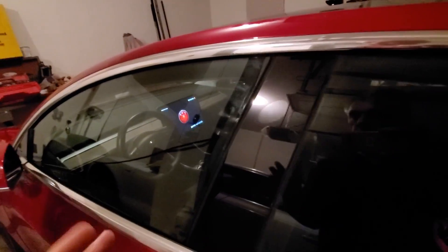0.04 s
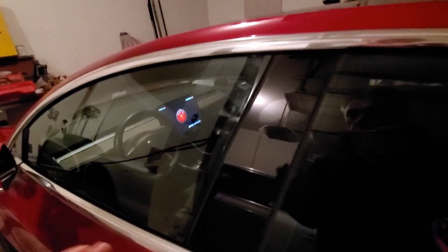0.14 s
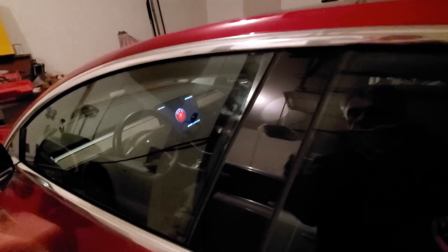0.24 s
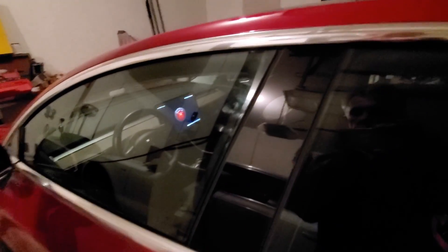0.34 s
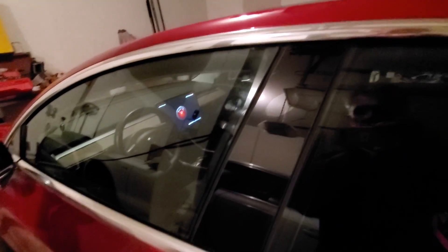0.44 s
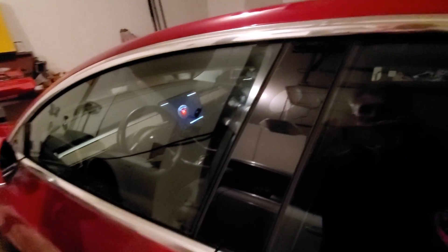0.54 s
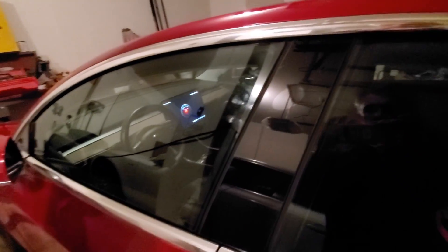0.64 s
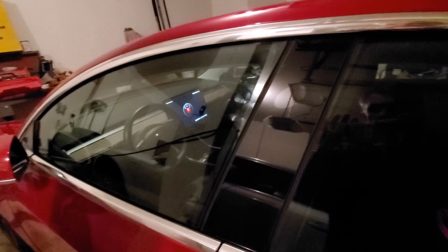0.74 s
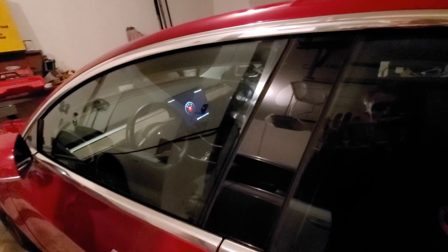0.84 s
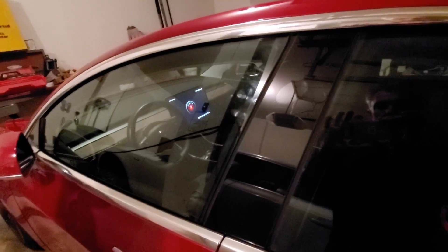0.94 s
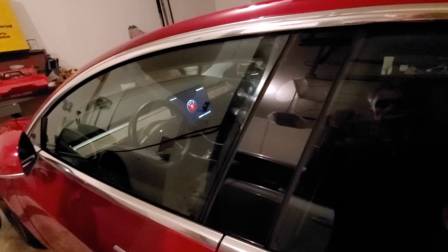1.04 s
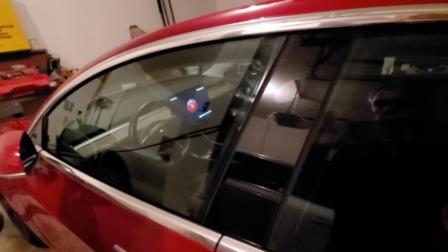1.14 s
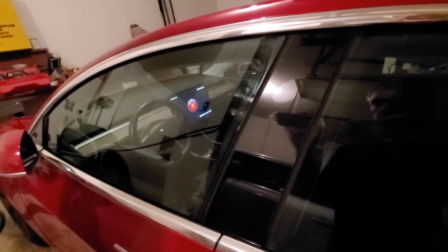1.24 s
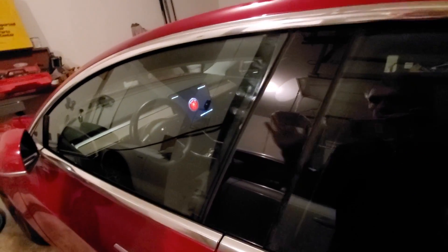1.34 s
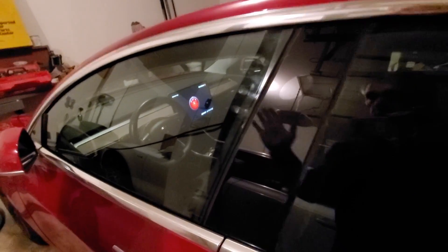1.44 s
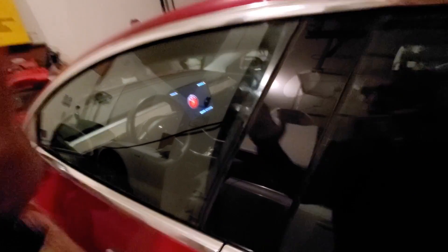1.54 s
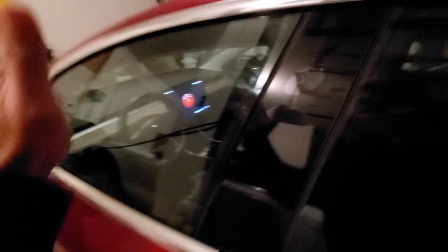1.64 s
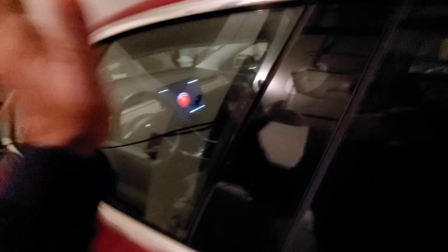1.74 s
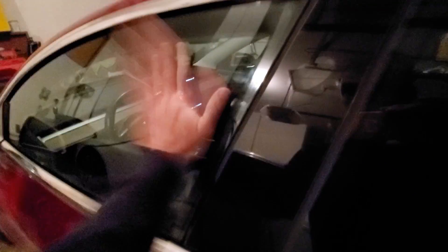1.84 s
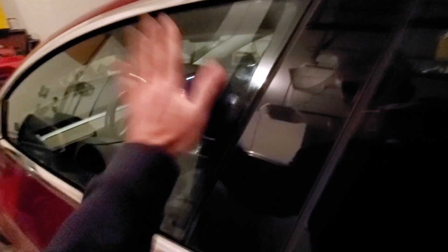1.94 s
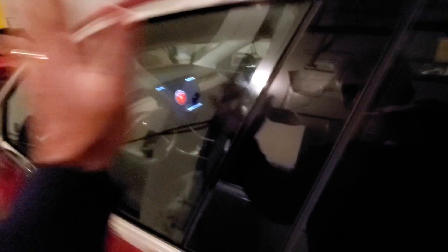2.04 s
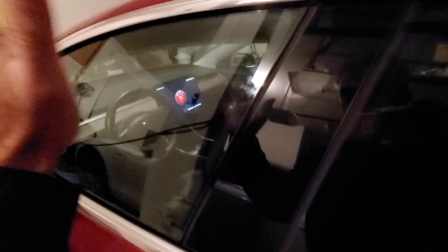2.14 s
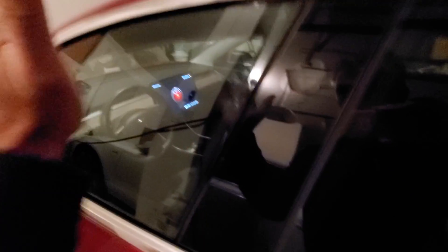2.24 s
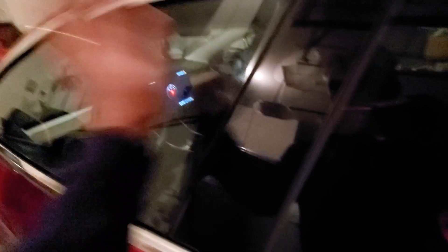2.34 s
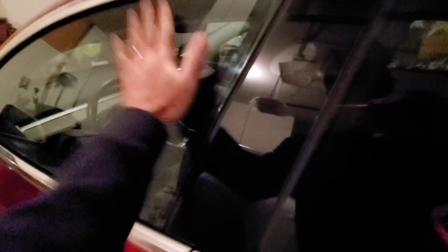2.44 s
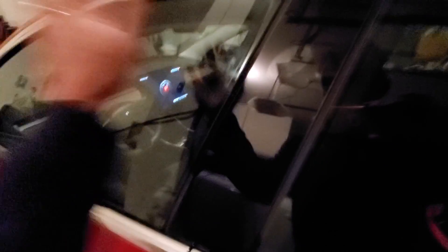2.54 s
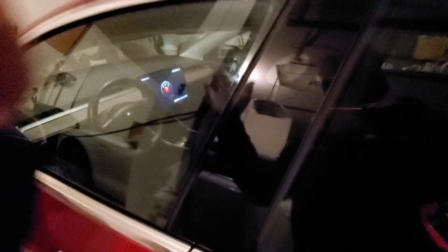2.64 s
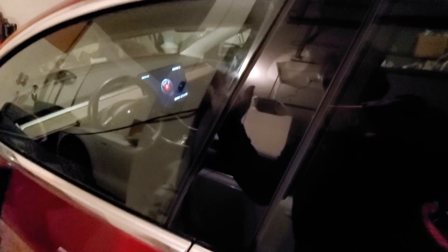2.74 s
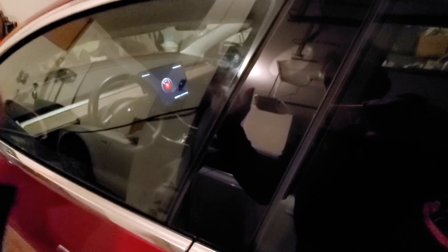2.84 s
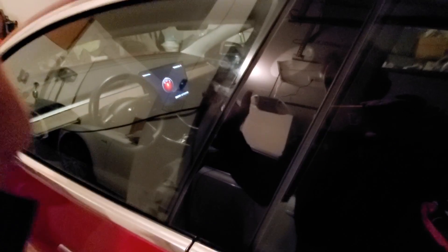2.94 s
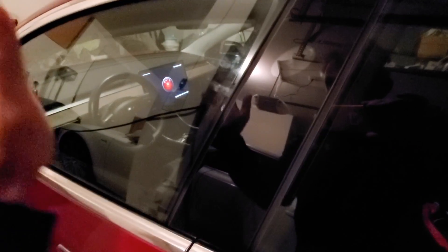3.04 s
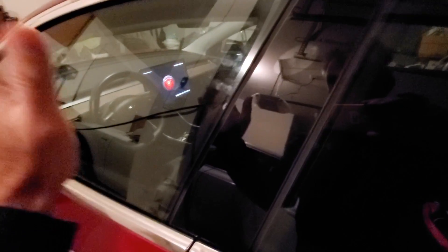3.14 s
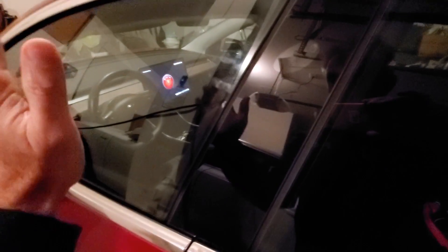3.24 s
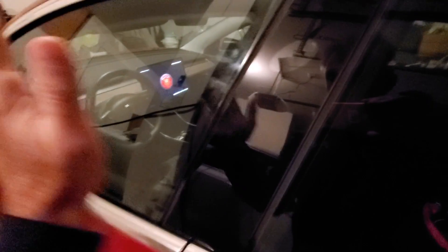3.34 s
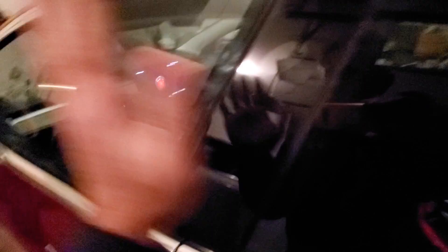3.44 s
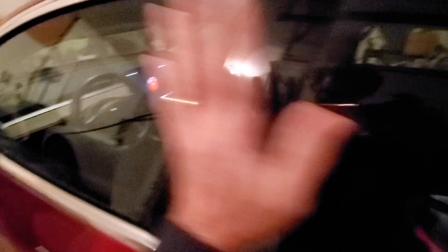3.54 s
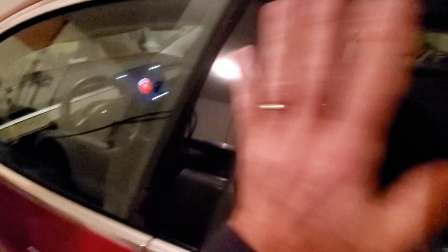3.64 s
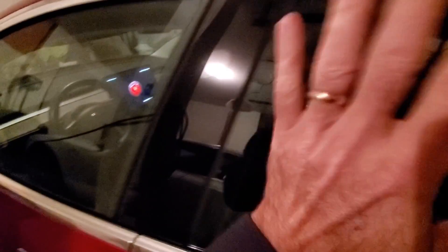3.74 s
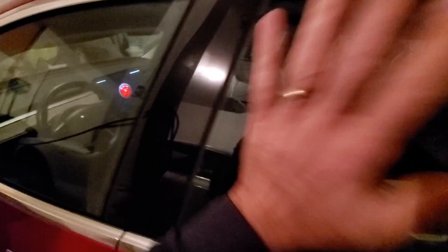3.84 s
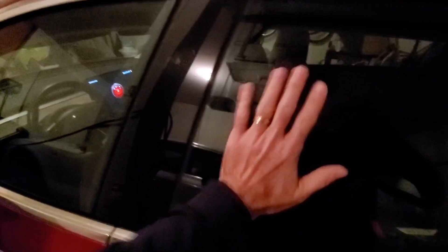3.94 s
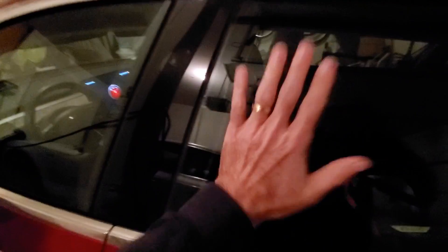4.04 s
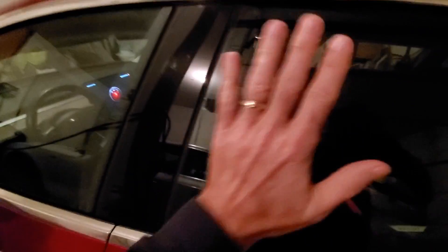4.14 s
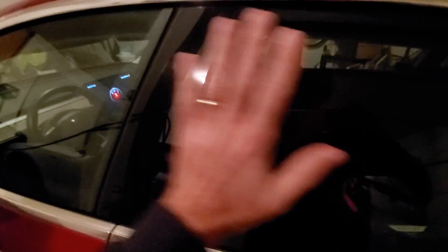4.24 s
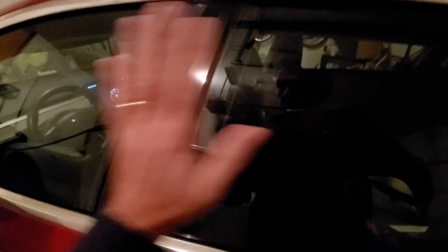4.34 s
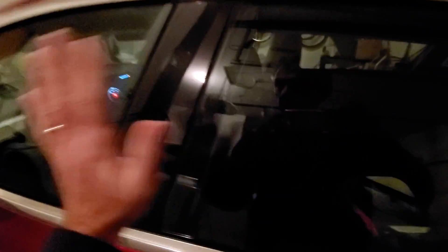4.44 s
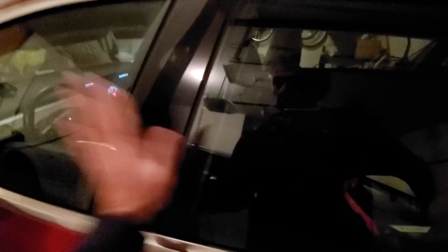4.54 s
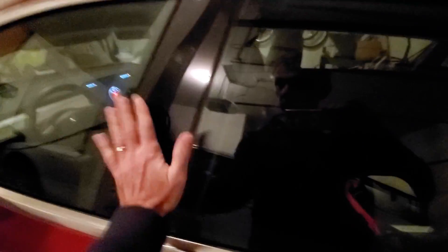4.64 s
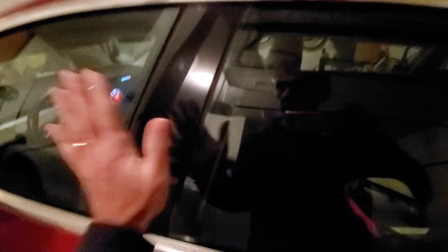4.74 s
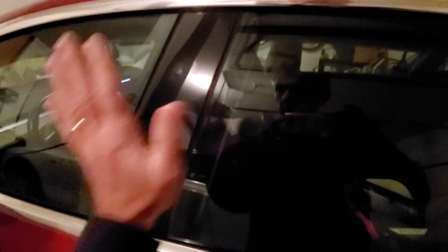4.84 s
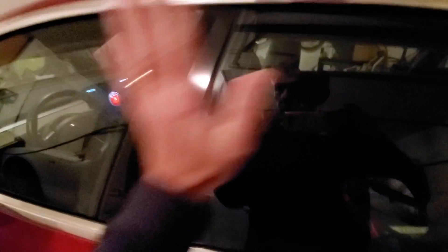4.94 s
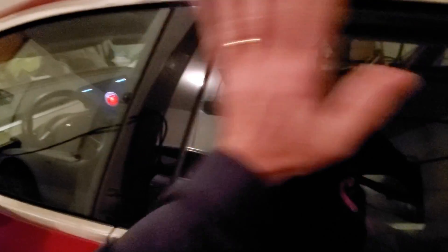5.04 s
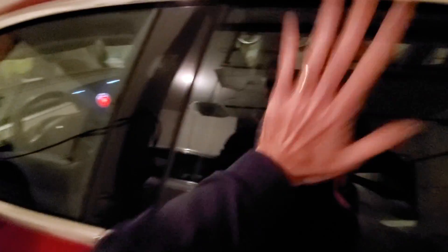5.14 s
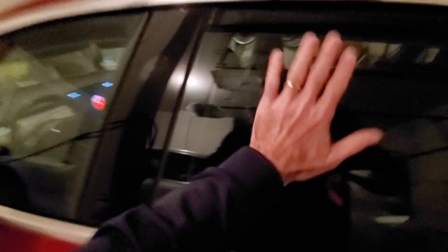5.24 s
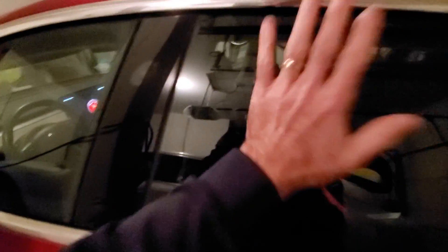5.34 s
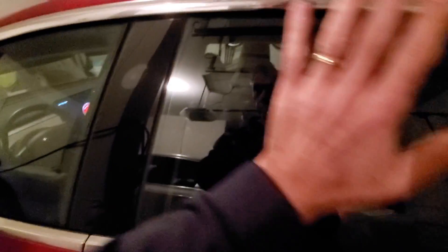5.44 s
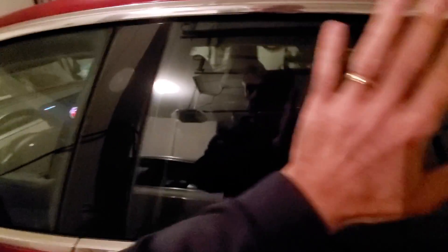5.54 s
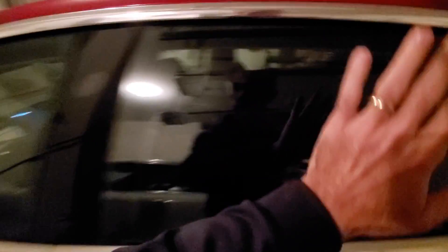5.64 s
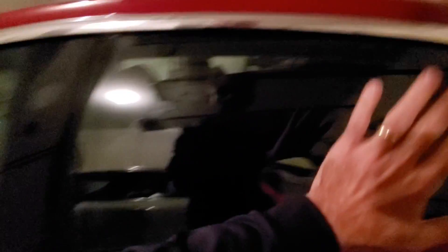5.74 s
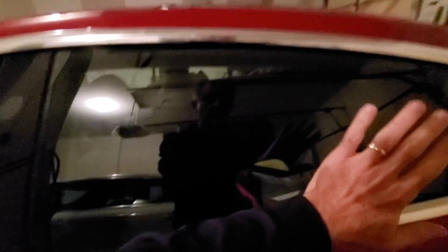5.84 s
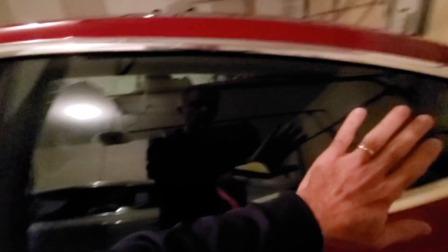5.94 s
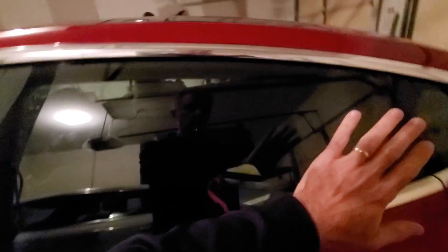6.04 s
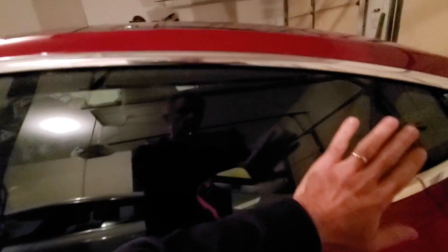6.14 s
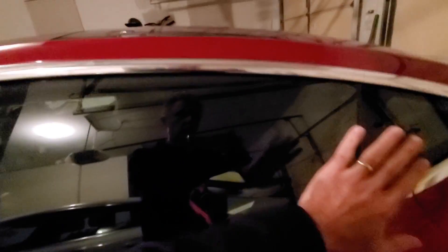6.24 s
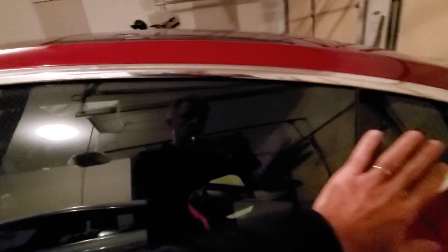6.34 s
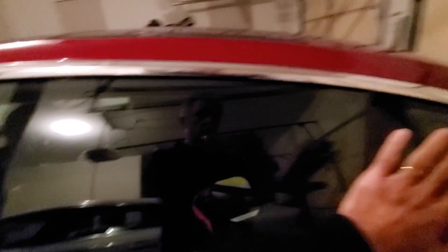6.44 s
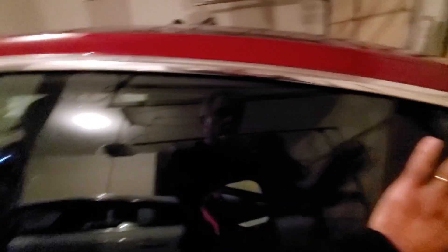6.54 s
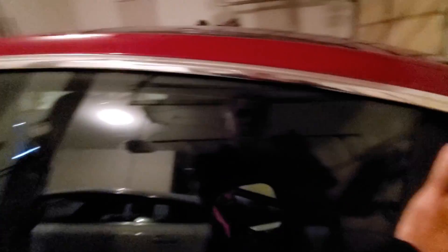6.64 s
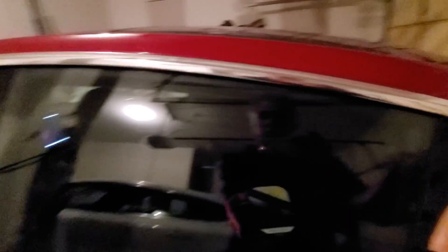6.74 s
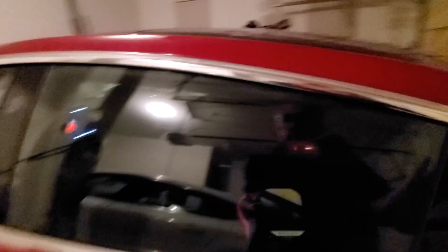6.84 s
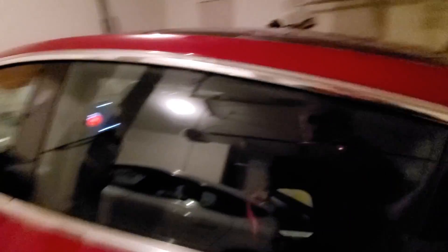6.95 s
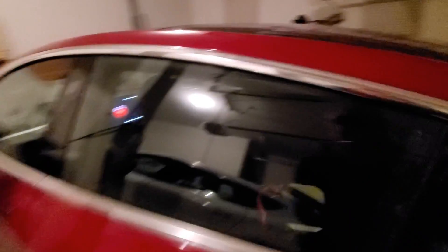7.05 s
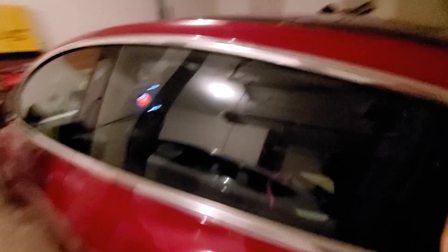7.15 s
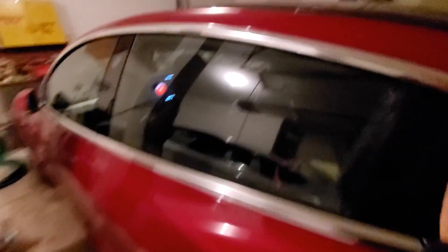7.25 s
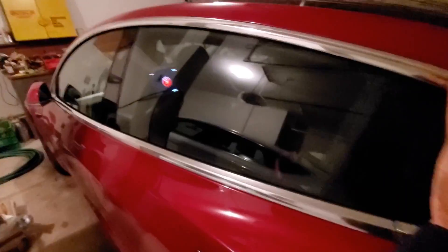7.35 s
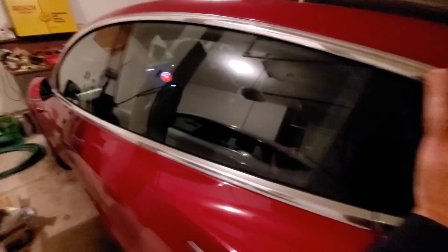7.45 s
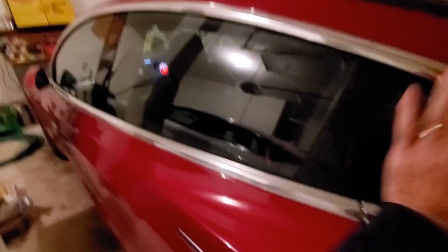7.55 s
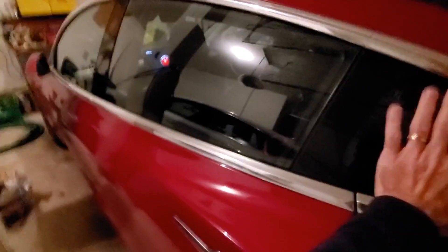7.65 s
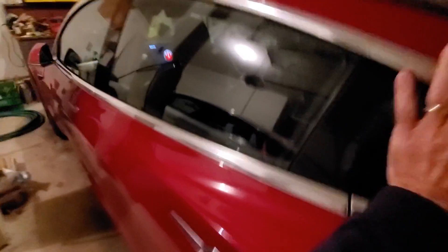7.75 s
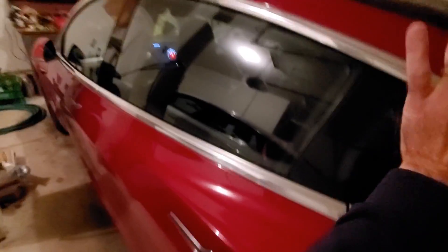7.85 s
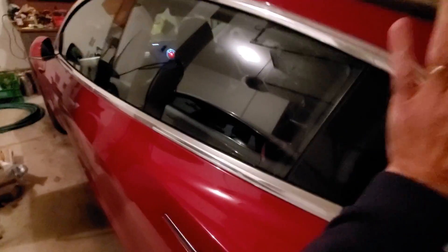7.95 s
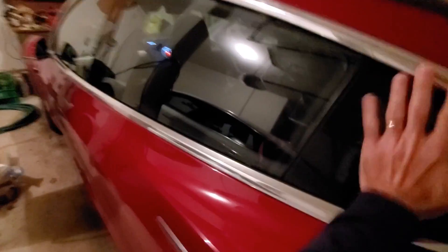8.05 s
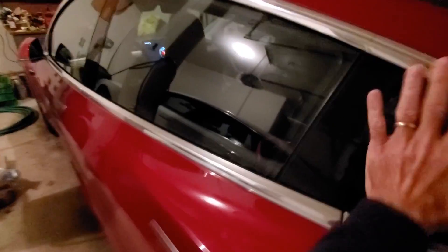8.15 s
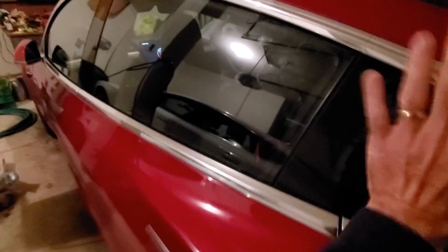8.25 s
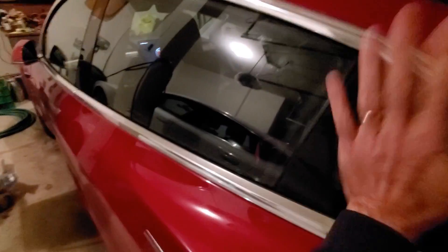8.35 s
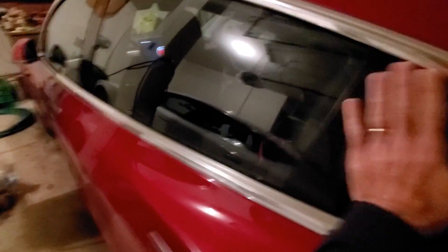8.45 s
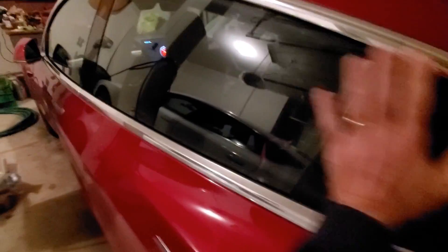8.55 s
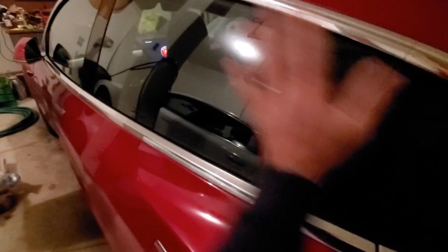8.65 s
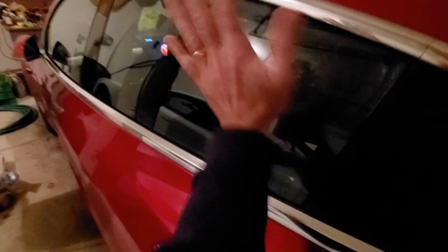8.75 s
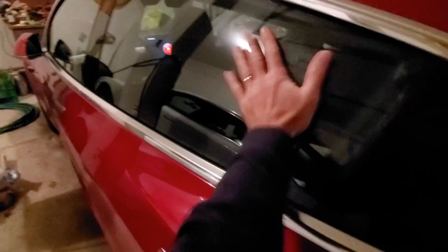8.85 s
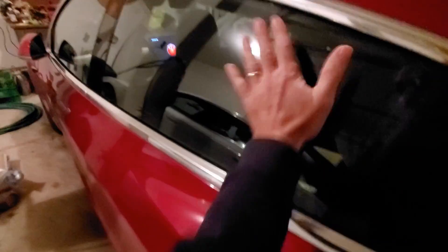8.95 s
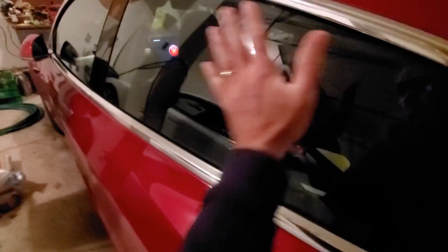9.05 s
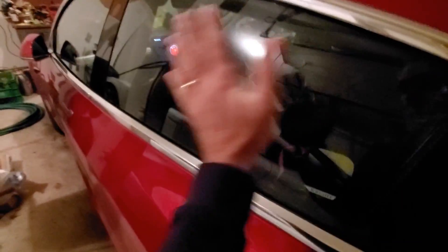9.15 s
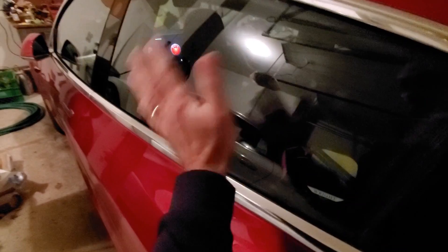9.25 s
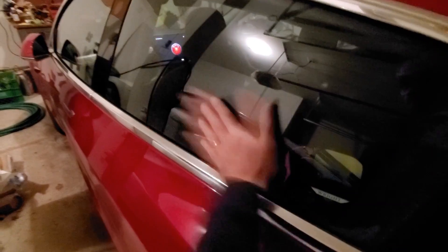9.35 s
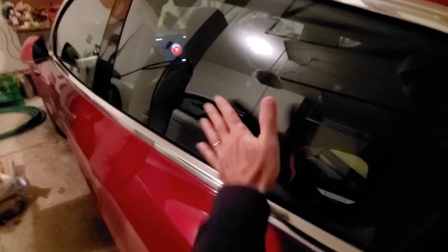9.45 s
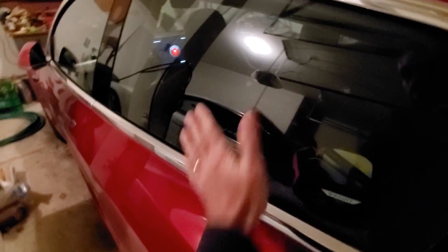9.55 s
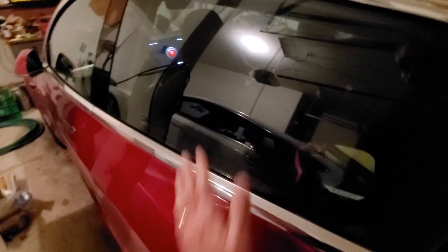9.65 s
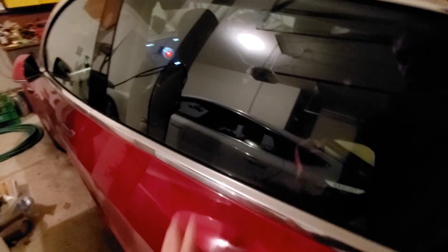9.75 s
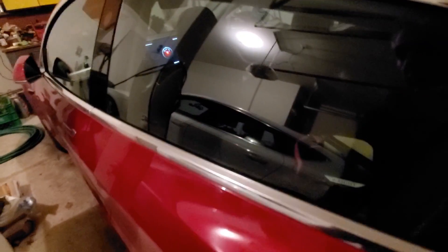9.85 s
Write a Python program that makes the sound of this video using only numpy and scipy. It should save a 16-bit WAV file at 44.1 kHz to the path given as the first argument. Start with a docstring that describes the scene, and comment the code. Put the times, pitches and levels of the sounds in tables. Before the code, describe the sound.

A few faint scuffs give way to five loud, sharp palm slaps on car window glass, each booming briefly and ringing on in the garage. In a pause, quiet footsteps scrape and tick on the concrete floor. Five more slaps follow in quicker succession, the first three on a smaller pane, and clothes rustle faintly at the end. The stereo microphone is close to the car, with a low rumble beneath everything.

```python
"""A bare garage, a stereo microphone close to a car. A few faint scuffs sound over a low rumble.
From 1.9 s a flat hand slaps the door windows five times: each pane knocks and booms in its modes,
skin and a finger ring crack on the glass, and the garage rings on. From 5.7 s shoes scuff, tick
and thud on the concrete. From 7.6 s three slaps knock on the small rear pane, and from 8.85 s
two more land on a door pane while clothes rustle faintly."""
import sys
import numpy as np
from scipy import signal
from scipy.fft import rfft, irfft
from scipy.io import wavfile
from scipy.ndimage import uniform_filter1d

SR = 44100
rng = np.random.default_rng(int(sys.argv[2]) if len(sys.argv) > 2 else 0)


def wav_out(sig):
    """Save sig, one row per channel (or a flat mono array), as 16-bit PCM at SR to the path in sys.argv[1]."""
    wavfile.write(sys.argv[1], SR, np.round(np.clip(np.atleast_2d(sig).T, -1, 1) * 32767).astype(np.int16))


N = 436149
LEAD_S = .005   # fingers may land this long before the palm

# Slaps, close up: (pane, time [s], contact [s], knock [dB], boom [dB], clap [dB], crack [dB],
# bright crack [dB], boom pitch [ratio], mode pitch [ratio], knock tilt [dB/octave], crack delay [s],
# treble left-right [dB], free swing [s], cupped palm [Hz], cupped palm [dB],
# bass to garage [dB], treble to garage [dB])
SLAPS = [("door", 1.864, .0008, -11, -10.5, -28, -8.5, -18.5, 1.05, 1.03, 1.3, .00078, -11.5, .035, 350, -30.5, 1.5, 8.3),
         ("door", 2.402, 0.0011, -8.5, -8, -22, 0, -4, 1.32, 1.07, 2.2, .003, 6.9, 0.019, 540, -19.5, -1.5, 3.5),
         ("door", 3.9516, .0012, -12, -13, -30.5, -5, -8, 1.132, 0.98, -3.5, .0015, -9, 0.041, 1300, -25.5, 4.7, 5.6),
         ("door", 4.609, .0009, -18.5, -18, -36, -17, -27.5, 0.92, 1.21, -7.5, -0.0013, -7.5, 0.047, 335, -17, -3, -1.2),
         ("door", 5.203, 0.0015, -12, -13, -28.5, -5, -8.5, 1.1, 1.05, -3, .0015, -7.5, 0.032, 1072, -15.5, 4.3, 5.3),
         ("rear", 7.6024, .0024, -13.5, -34, -32, -21, -25.5, 0.77, 1.034, 2.2, -.0025, -13.5, .034, 385, -4.5, .13, 0.7),
         ("rear", 8.056, 0.0025, -6, -17.5, -23.5, -7.5, -9.5, .83, 1.02, .15, 0.0027, -11, 0.025, 1700, -20, 1, 6.8),
         ("rear", 8.411, 0.00053, -12, -14.5, -22.5, -8.5, -16, 1.02, 1.02, -4, .002, -18, .023, 1616, -11.5, .42, 0.12),
         ("door", 8.850, 0.00078, -7.5, -9.5, -21.5, 1.6, -6.5, 1.15, .92, 0.96, 0.0019, -6, 0.036, 3200, -37.5, -0.93, -0.19),
         ("door", 9.388, 0.00072, -9.5, -20.5, -26.5, -10.5, -21.5, 0.894, .95, -6, .0028, -7.5, 0.071, 385, -15, -1.9, -.2)]
def slap(pane, contact, knock_db, boom_db, clap_db, crack_db, bright_db, boom_pitch, pitch, tilt_db,
         delay, pan_db, free, cup_hz, cup_db, bass_sent_db, treble_sent_db):
    """A hand hits the glass; returns the stereo sound at the microphone and the feed to the garage."""
    t = np.arange(SR // 3) / SR - LEAD_S
    bass, clap = pane_modes(t, pane, contact, knock_db, boom_db, clap_db,
                            boom_pitch, pitch, tilt_db, delay, free)
    ring, skin, smooth_skin = hand_crack(np.maximum(t - delay, 0), crack_db, bright_db)
    # the pocket of air under the cupped palm rings for 24 cycles
    cup = from_db(cup_db) * ringing(t - max(delay, .0024), cup_hz, t60=24 / cup_hz)
    cup_pan_db = pan_db * min(cup_hz / 1200, 1)   # leans fully to one side only above 1200 Hz
    treble = clap + ring + skin
    treble = np.array([np.roll(treble, 6), treble])   # reaches the microphone's left side later
    direct = bass * pan(-1.2) + treble * pan(pan_db) + cup * pan(cup_pan_db)
    sent = bass * from_db(bass_sent_db) + (clap + ring + cup + smooth_skin) * from_db(treble_sent_db)
    return direct, sent


# Modes of a door pane and the rear pane, before each slap shifts them:
# (frequency [Hz], level [dB], t60 [s])
DOOR_MODES = [(62.4, -0.5, 0.62), (86.4, 7, 0.14), (107.6, -19, 0.05), (196, -3, 0.11), (255, -0.5, 0.049),
              (292, -6, 0.071), (349.3, -5.5, 0.11), (455, -6.5, 0.11), (536, -18.5, 0.092),
              (670, 2.5, 0.035), (828, -10.5, 0.21), (990, 1, 0.036), (1185, 2, 0.035), (1364, -8, 0.11),
              (1755, -9.5, .05)]
REAR_MODES = [(98, 4.5, 0.11), (179.3, -3.5, 0.15), (271, 2, 0.045), (378.6, 1.5, 0.059), (510, -13, 0.12),
              (604, -27, 0.066), (739, -28, 0.21), (854, 2.5, 0.038), (990, -19, 0.18), (1200, 2.5, 0.028),
              (1270, -8.5, 0.048), (1510, -11.5, 0.11), (1930, -15.5, 0.076)]
def pane_modes(t, pane, contact, knock_db, boom_db, clap_db, boom_pitch, pitch, tilt_db, delay, free):
    """The glass gives way with a knock, then swings back and booms; its high modes clap."""
    modes = DOOR_MODES if pane == "door" else REAR_MODES
    bass, clap = np.zeros((2, len(t)))
    pressed = .15 + .8 / (1 + (np.maximum(t, 0) / free) ** 6)   # the settling palm damps the boom
    for (hz, db, t60), (jitter_db, wait, coin) in zip(modes, rng.random((len(modes), 3))):
        if hz < 150:
            bass += from_db(boom_db + db) * ringing(t - .0016, hz * boom_pitch, t60) * pressed
        elif hz < 600:   # the knock starts inward, and the palm shortens it
            gain = from_db(knock_db + db + tilt_db * np.log2(hz / 300))
            bass -= gain * ringing(t, hz * pitch, t60 * .77)
        else:   # fingers land a moment apart from the heel of the hand
            gain = from_db(clap_db + db + jitter_db) * np.sign(coin - .5)
            clap += gain * ringing(t - delay * wait, hz * pitch, t60)
    bass *= 1 - np.exp(-np.maximum(t, 0) / contact)   # the palm flattens before it pushes fully
    return low_cut(bass, hz=50, order=2), clap   # a pane pushes little air below this


# Skin striking glass: (frequency [Hz], level [dB])
SKIN_SPECTRUM = [(900, -21.5), (1500, -1.5), (2500, -6), (4000, -5.5), (6000, -13), (8500, -5),
                 (11000, -5.5), (15500, -11.5), (16600, -20)]
def hand_crack(t, crack_db, bright_db):
    """A finger ring pings and skin cracks; returns ping, crack and a smooth click of the same colour."""
    ring = from_db(bright_db - 16) * ringing(t - .001, hz=8400, t60=.012)
    burst = (1 - np.exp(-t / .0004)) * (from_db(-60 * t / .018) + .1 * from_db(-60 * t / .07))
    hz = np.maximum(np.fft.rfftfreq(len(t), 1 / SR), 1)
    colour = from_db(at_hz(SKIN_SPECTRUM, hz) + np.where(hz < 6000, crack_db, bright_db))
    skin = irfft(rfft(rng.standard_normal(len(t))) * colour, len(t)) * burst
    smooth_skin = np.roll(irfft(colour, len(t)), np.argmax(burst)) * np.sqrt(np.sum(burst ** 2))
    return ring, skin, smooth_skin


# Fingertips on the window: (time [s], level [dB], pitch [Hz], snap relative to tone [dB])
FINGERTIPS = [(2.399, -37.5, 3200, -13), (3.949, -27.5, 259.7, -25.5), (4.6056, -16, 345, -27.5),
              (5.199, -34.5, 299, -16.5), (8.051, -27.5, 300, -7), (8.055, -27.5, 1520, 5.5),
              (8.848, -29.5, 279, -18.5), (9.384, -36, 283, -30.5)]
def fingertips():
    """The glass gives way softly under the fingertips just before the palm lands."""
    out, t = np.zeros((2, N)), np.arange(SR // 3) / SR
    for s, db, hz, snap_db in FINGERTIPS:
        snap = rng.standard_normal(len(t)) * from_db(snap_db - 60 * t / .008)
        touch = (snap - ringing(t, hz, t60=.015)) * (1 - np.exp(-t / .001))
        add(out, s, touch * from_db(db) * pan(-2.5))
    return out


# Decay of the bare garage: (frequency [Hz], t60 [s])
GARAGE_T60 = [(50, 0.53), (130, 0.57), (350, 0.68), (920, 0.58), (1600, 0.65), (2400, .7), (3400, 0.62),
              (5000, .66), (8000, 0.47), (11000, 0.5), (15000, .33)]
# Colour of its echoes: (frequency [Hz], level [dB])
GARAGE_COLOUR = [(40, -15), (90, -15.5), (200, -6.5), (350, -10), (550, -6.5), (800, -7.5), (1150, -7),
                 (1550, -4), (1850, -6), (2250, -9), (2750, -3.5), (3500, -3), (4200, -9), (5000, -12.5),
                 (6500, -8), (8500, -6.5), (11000, -18), (15000, -13)]
# Their balance at the microphone: (frequency [Hz], left-right [dB])
GARAGE_BALANCE = [(200, -0.8), (700, -.5), (1300, -4.5), (2400, -1), (4400, 0)]
def garage(sent):
    """The diffuse field: each band stores energy and lets it go at its own rate as dense echoes."""
    out, edges_hz = 0, 35 * 2 ** np.arange(0, 9.05, .18)
    whites = [stereo_noise([(20, 0), (20000, 0)]) for _ in range(2)]
    rise, wall_delay = np.exp(-1 / (.012 * SR)), round(.007 * SR)
    for k, (low, high) in enumerate(zip(edges_hz, edges_hz[1:])):
        band = signal.butter(2, [low, high], "band", fs=SR, output="sos")
        hz = np.sqrt(low * high)
        decay = from_db(-120 / (at_hz(GARAGE_T60, hz) * SR))
        energy = signal.sosfilt(band, sent) ** 2
        stored = signal.lfilter([1 - rise], np.convolve([1, -decay], [1, -rise]), energy)
        envelope = np.sqrt(np.abs(np.roll(stored, wall_delay)))
        echoes = rms_one(signal.sosfilt(band, whites[k % 2]))
        gain = from_db(at_hz(GARAGE_COLOUR, hz) - 32) * pan(at_hz(GARAGE_BALANCE, hz))
        out = out + gain * envelope * echoes
    return out


# Heels on the floor by the car: (time [s], level [dB], pitch [Hz], t60 [s])
HEELS = [(6.999, -38, 90, 0.13), (7.08, -38, 75, 0.15), (7.365, -21, 74, 0.16)]
def heel_thuds():
    """Each heel lands with a soft, low thud."""
    out, t = np.zeros((2, N)), np.arange(SR // 3) / SR
    for s, db, hz, t60 in HEELS:
        add(out, s, from_db(db) * ringing(t, hz, t60) * (1 - np.exp(-t / .015)) ** 2)
    return out


# Ticks underfoot, right of the microphone:
# (time [s], level [dB], pitch [Hz], t60 [s], left-right [dB], snap relative to tone [dB])
SOLE_TICKS = [(.035, -52, 1310, 0.0091, -7, -5), (1.523, -67, 6500, .004, -3, 0),
              (5.726, -48, 3470, 0.0056, -5, -10), (5.819, -46.5, 1360, 0.032, -6, -15),
              (5.896, -38, 3530, 0.0053, -6, -6), (6.406, -46.5, 300, 0.023, -5, -25),
              (6.647, -47, 1620, 0.15, -13, -44), (7.005, -41.5, 410, 0.013, -11, -17),
              (7.018, -54, 3010, 0.13, -6, -25), (7.096, -40, 437, 0.031, -8, -25),
              (7.199, -53.5, 1420, 0.063, -15, -21), (7.367, -40.5, 1313, 0.065, -13, -12),
              (7.495, -44, 1260, 0.0082, -12, -21)]
def sole_ticks():
    """Grit ticks and rubber squeaks on concrete: a snap of noise and a short tone."""
    out, t = np.zeros((2, N)), np.arange(SR // 3) / SR
    for s, db, hz, t60, pan_db, snap_db in SOLE_TICKS:
        snap = rng.standard_normal(len(t)) * from_db(snap_db - 60 * t / .006)
        add(out, s, (ringing(t, hz, t60) + snap) * from_db(db) * pan(pan_db))
    return out


# Shoe and sleeve scuffs: (peak time [s], rise [s], t60 [s], scrape [dB], hiss [dB], drag [dB])
SCUFFS = [(.045, .01, 0.44, -70, -66, -74), (.56, 0.26, 0.74, -88, -79, -77),
          (1.74, 0.032, .6, -82, -88, -75), (5.738, 0.014, 0.45, -72, -67.5, -82),
          (5.838, 0.016, 0.27, -52, -63.5, -71), (5.896, 0.05, 0.42, -63.5, -58, -76),
          (6.28, .01, .3, -82, -76, -88), (6.41, .008, 0.66, -79, -87, -61),
          (6.55, 0.076, 0.76, -55, -52.5, -62), (6.655, 0.053, 0.42, -49.5, -50.5, -56),
          (7.012, .012, 0.81, -54.5, -59.5, -50.5), (7.1, 0.0093, 0.34, -50, -65, -47.5),
          (7.207, 0.017, 0.62, -55.5, -60, -55), (7.372, 0.011, 0.45, -48.5, -46, -49.5),
          (7.5, .02, 0.98, -71, -62.5, -66)]
# Faint rustle of clothes: (time [s], bright level [dB], dull level [dB])
CLOTHES = [(0, -84, -85), (.3, -86, -86), (.6, -88, -83), (.7, -87, -88), (1.3, -83.5, -88),
           (1.51, -79, -85), (1.525, -70, -89), (1.65, -75, -91), (1.85, -74.5, -82), (2.4, -90, -90.5),
           (3.1, -105, -104), (3.6, -103, -100), (3.93, -86, -91), (4.3, -100, -100), (6.2, -91, -97.5),
           (6.35, -78, -86), (6.9, -82.5, -76), (9.4, -82.5, -83.5), (9.7, -75.5, -79),
           (9.89, -87.5, -84.5)]
# Spectra of the three scuff layers and the bright rustle: (frequency [Hz], level [dB])
SCRAPE_SPECTRUM = [(350, -37.5), (600, -7.5), (658, -8), (1480, -3), (1610, -2), (2080, -17), (2600, -14.5),
                   (3380, -40), (5720, -120)]
HISS_SPECTRUM = [(1180, -32.5), (2000, -5.5), (3030, -3), (3950, -4), (4550, -7), (12300, -12.5),
                 (15900, -16.5), (16500, -44)]
DRAG_SPECTRUM = [(110, -29.5), (180, 1.5), (328, -9), (381, -7), (421, -4), (620, -16), (810, -37.5),
                 (1360, -120)]
CLOTHES_SPECTRUM = [(410, -33), (700, -2), (1060, -5), (1140, -3.5), (1560, -1), (2000, -5.5), (3240, -4),
                    (4610, -7.5), (8420, -1.5), (15200, -11), (16000, -13.5)]
def scuffs_and_rustle():
    """Soles drag on gritty concrete in grainy swells of scrape, hiss and dull drag; clothes rustle."""
    t, levels = np.arange(N) / SR, np.zeros((3, N))
    swell_db = 14.5
    for s, rise, t60, *layers_db in SCUFFS:
        span = slice(max(round((s - 2 * rise) * SR), 0), round((s + t60) * SR))
        from_peak = t[span] - s
        shape_db = np.where(from_peak < 0, swell_db * from_peak / rise, -60 * from_peak / t60)
        levels[:, span] = np.hypot(levels[:, span], from_db(shape_db + np.array(layers_db)[:, None]))
    scrape, hiss, drag = levels
    grain = rms_one(uniform_filter1d(rng.exponential(1, N) ** 3, size=60) + 14)
    bright, dull = from_db(in_time(CLOTHES))
    friction = bright * stereo_noise(CLOTHES_SPECTRUM)
    friction += np.hypot(scrape, dull) * stereo_noise(SCRAPE_SPECTRUM)
    friction += hiss * stereo_noise(HISS_SPECTRUM)
    friction += drag * stereo_noise(DRAG_SPECTRUM)
    return grain * friction


# Background rumble in the garage: (time [s], level [dB])
RUMBLE_LEVEL = [(0, -52), (.6, -54.5), (1.0, -55.5), (1.8, -51), (3.0, -62.5), (3.9, -53), (4.5, -63),
                (5.1, -62.5), (5.7, -62), (6.3, -59), (6.7, -56), (7.2, -48.5), (7.6, -61), (8.8, -56.5),
                (9.89, -63.5)]
# Its spectrum: (frequency [Hz], level [dB])
RUMBLE_SPECTRUM = [(12, -40), (20, -16), (38, -1.5), (59, 1.5), (86, -9.5), (123, -13.5), (249, -30),
                   (279, -25.5), (298, -36), (1000, -51), (1300, -78.5), (2200, -120)]
def rumble():
    """Deep noise slowly swells and sinks."""
    return from_db(in_time(RUMBLE_LEVEL)[0]) * stereo_noise(RUMBLE_SPECTRUM)


# The microphone's noise floor: (frequency [Hz], level [dB])
FLOOR_SPECTRUM = [(350, -44.5), (600, -5), (680, 1.5), (948, -12), (4070, -17.5), (13600, -11),
                  (16500, -19.5)]
def self_noise():
    """The microphone adds a faint, steady hiss of its own."""
    return from_db(-91) * stereo_noise(FLOOR_SPECTRUM)


# Likeness of the microphone's two sides: (frequency [Hz], correlation [-1 to 1])
STEREO_LIKENESS = [(60, 0.98), (200, .9), (500, 0.59), (1200, -0.088), (3000, -.1), (8000, .05),
                   (15000, 0.36)]
def stereo_noise(spectrum):
    """Coloured noise whose two sides are alike in the bass and mostly unrelated in the treble; rms 1."""
    hz = np.maximum(np.fft.rfftfreq(N, 1 / SR), 1)
    mid, side = rfft(rng.standard_normal((2, N)))
    alike = at_hz(STEREO_LIKENESS, hz)
    both = np.sqrt(1 + alike) * mid + np.sqrt(1 - alike) * side * [[1], [-1]]
    return rms_one(irfft(both * from_db(at_hz(spectrum, hz)), N))


def from_db(db):
    """Decibels to gain."""
    return 10 ** (np.asarray(db) / 20)


def pan(db):
    """Stereo gains with the left side db above the right."""
    return from_db([[db / 2], [-db / 2]])


def rms_one(x):
    """Scaled to rms 1."""
    return x / np.sqrt(np.mean(x ** 2) + 1e-20)


def at_hz(points, hz):
    """A table over frequency, read on a log axis."""
    frequencies, values = np.transpose(points)
    return np.interp(np.log(hz), np.log(frequencies), values)


def in_time(rows):
    """Columns of a curve at every sample."""
    s, *columns = np.transpose(rows)
    return [np.interp(np.arange(N) / SR, s, c) for c in columns]


def ringing(t, hz, t60):
    """A damped sine that starts at t = 0."""
    t = np.maximum(t, 0)
    return np.sin(2 * np.pi * hz * t) * from_db(-60 * t / t60)


def low_cut(x, hz, order):
    """Rolls off the bass below hz."""
    return signal.sosfilt(signal.butter(order, hz, "high", fs=SR, output="sos"), x)


def add(track, s, sound):
    """Mixes a sound into the track at s seconds."""
    i = round(s * SR)
    track[..., i:i + sound.shape[-1]] += sound[..., :N - i]


def scene():
    """Slaps and steps close by, the garage's echoes around them, scuffs and low noise behind."""
    near = sole_ticks() + fingertips() + heel_thuds()
    sent = near.mean(0) + 1e-9
    for pane, s, *blow in SLAPS:
        direct, to_garage = slap(pane, *blow)
        add(near, s - LEAD_S, direct)
        add(sent, s - LEAD_S, to_garage)
    return near + rumble() + garage(sent) + scuffs_and_rustle() + self_noise()


def record(dry):
    """The deepest bass is dropped, peaks are rounded and clipped, treble above 16.7 kHz is cut."""
    overload, cutoff_hz = 3.4, 16700
    rounded = overload * np.tanh(low_cut(dry, hz=36, order=3) / overload)
    treble_cut = signal.cheby2(14, 70, cutoff_hz, fs=SR, output="sos")
    return signal.sosfilt(treble_cut, np.clip(rounded, -.93, .93))


dry = scene()
out = record(dry)
wav_out(out)
```